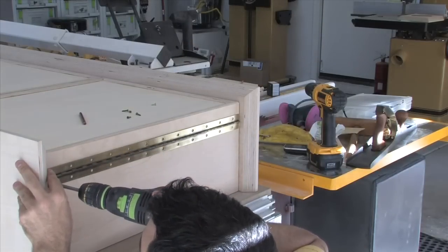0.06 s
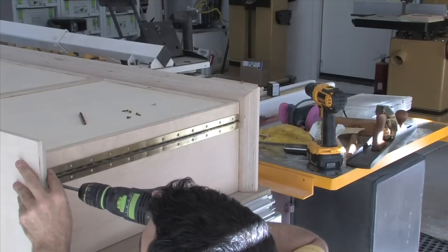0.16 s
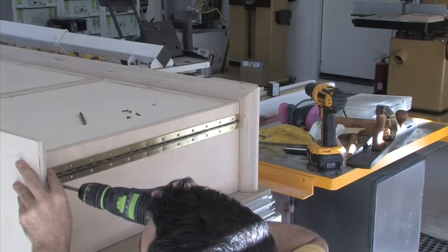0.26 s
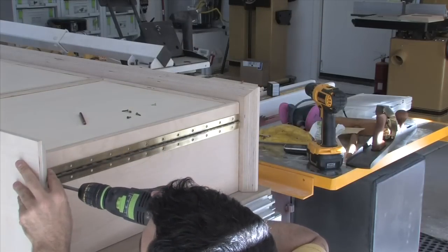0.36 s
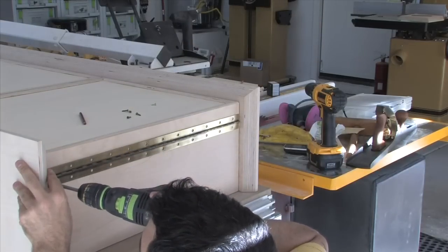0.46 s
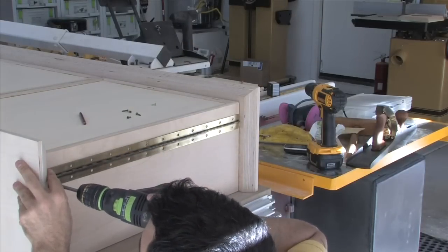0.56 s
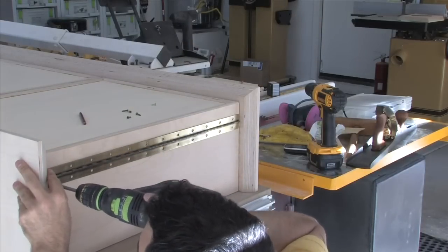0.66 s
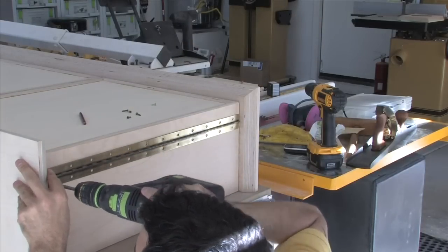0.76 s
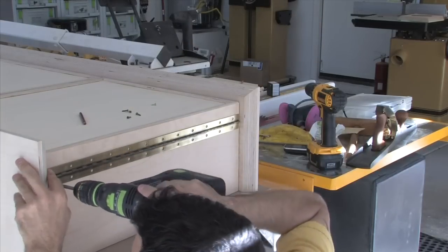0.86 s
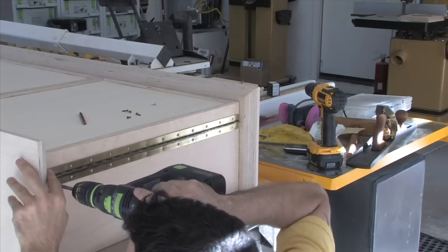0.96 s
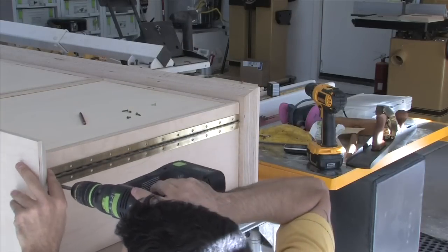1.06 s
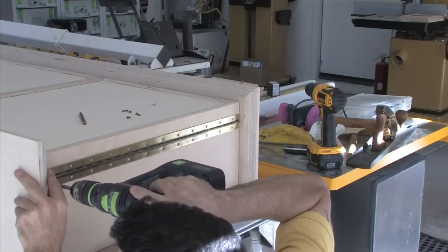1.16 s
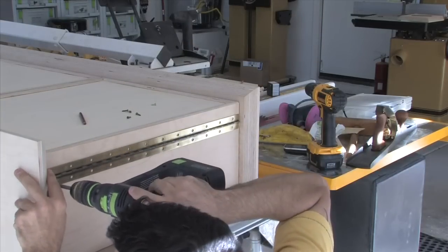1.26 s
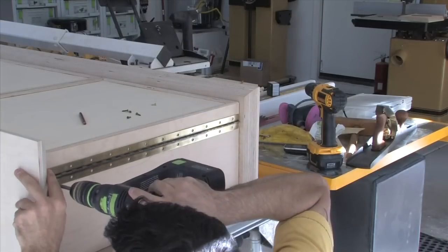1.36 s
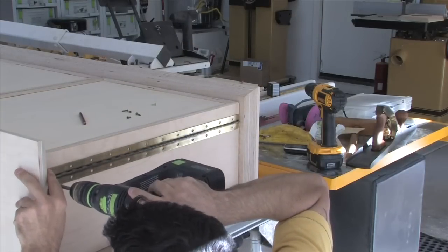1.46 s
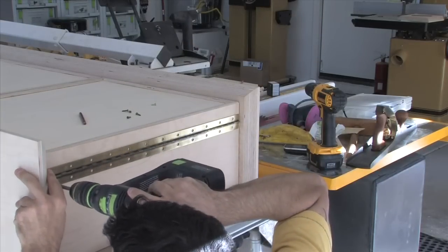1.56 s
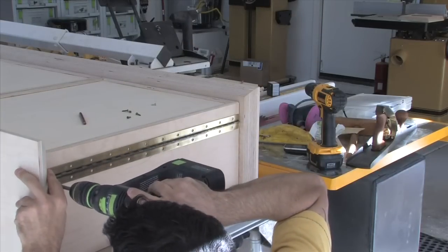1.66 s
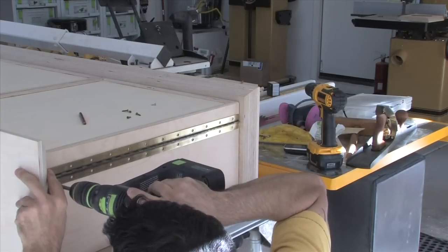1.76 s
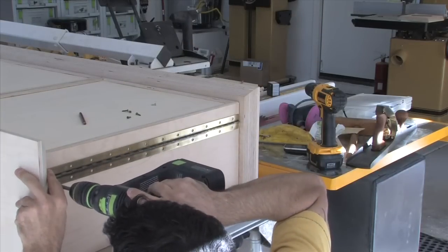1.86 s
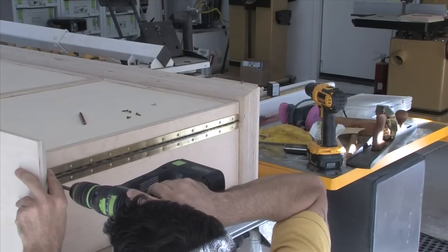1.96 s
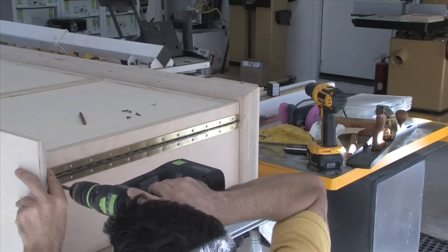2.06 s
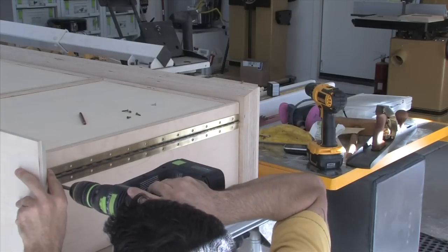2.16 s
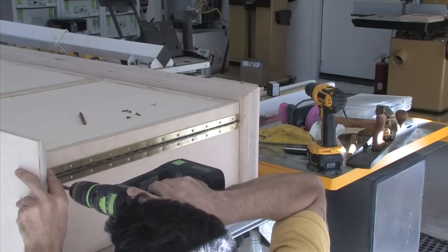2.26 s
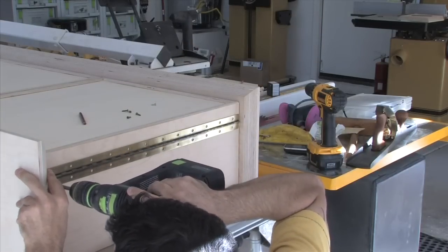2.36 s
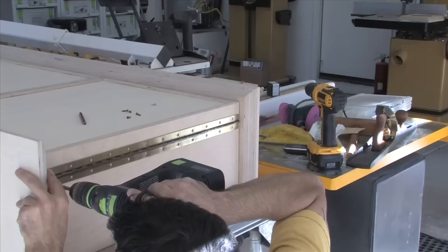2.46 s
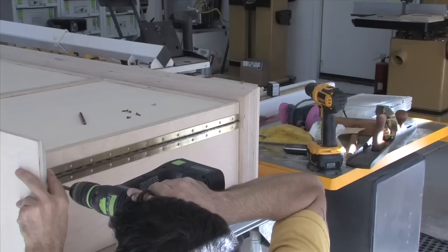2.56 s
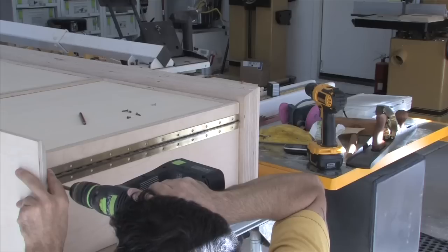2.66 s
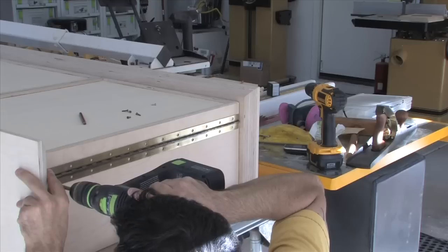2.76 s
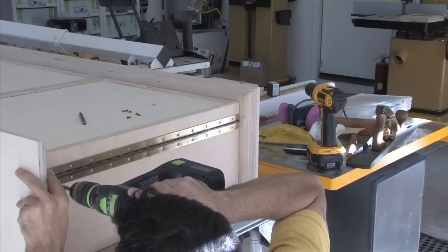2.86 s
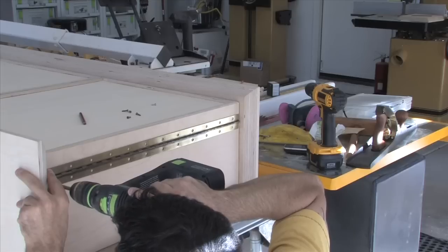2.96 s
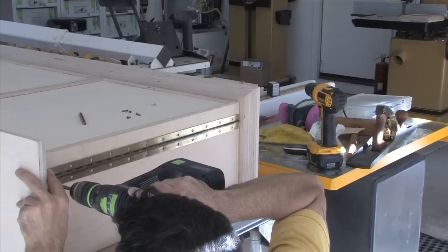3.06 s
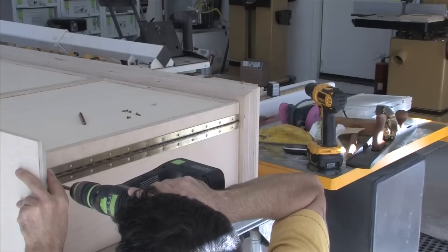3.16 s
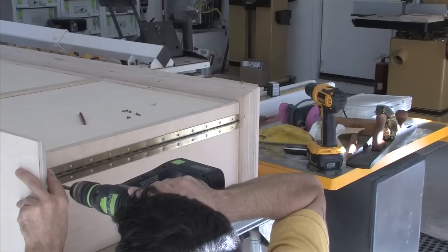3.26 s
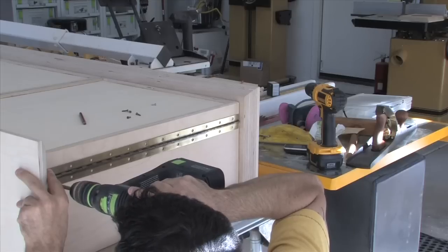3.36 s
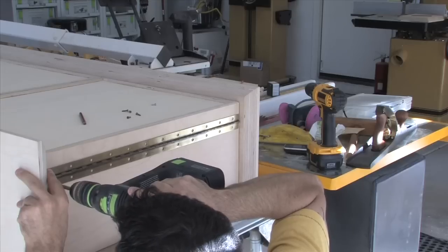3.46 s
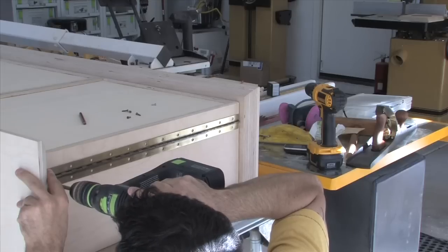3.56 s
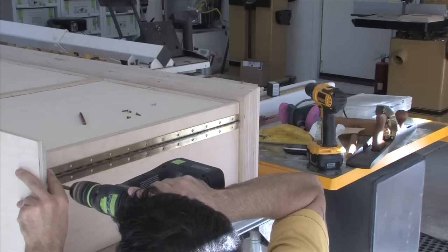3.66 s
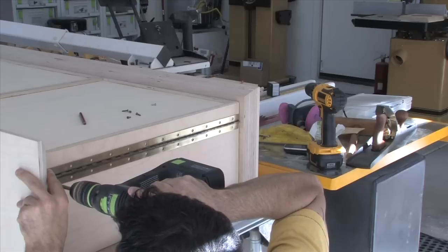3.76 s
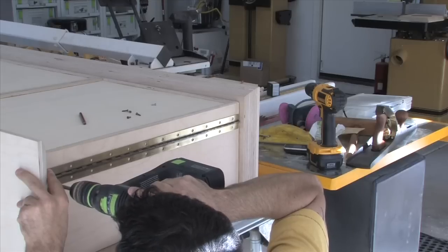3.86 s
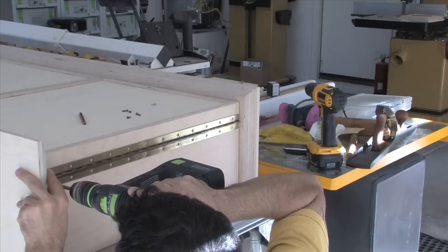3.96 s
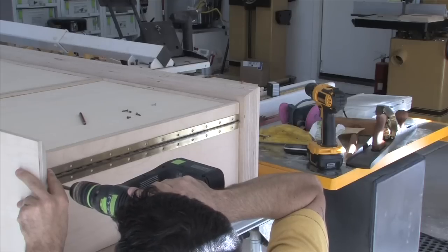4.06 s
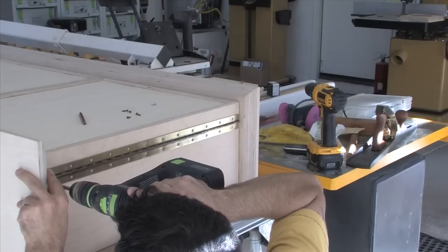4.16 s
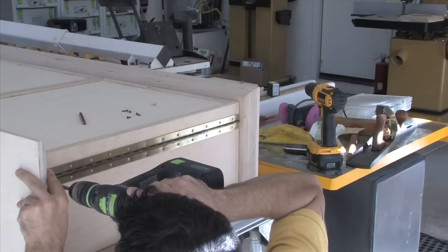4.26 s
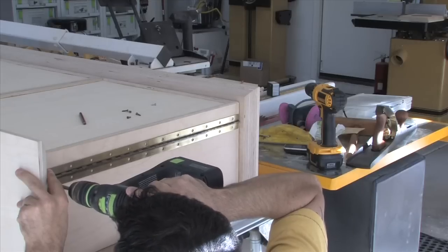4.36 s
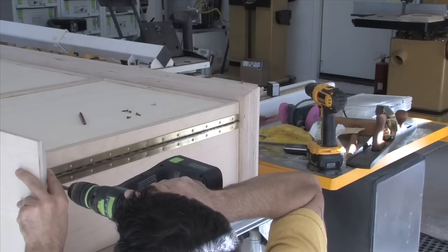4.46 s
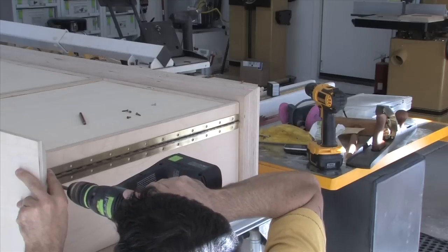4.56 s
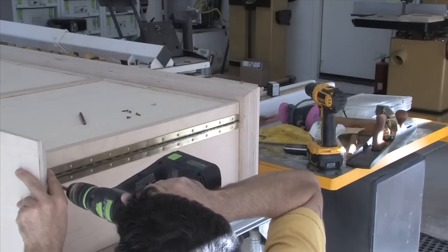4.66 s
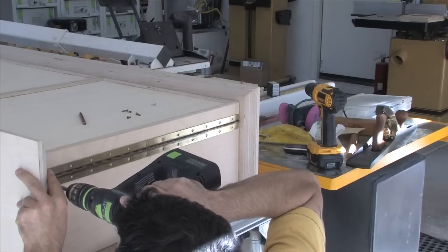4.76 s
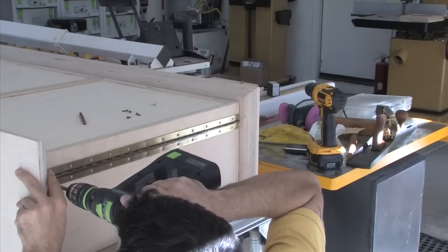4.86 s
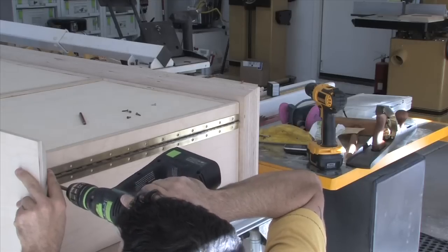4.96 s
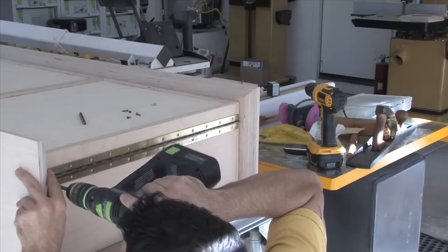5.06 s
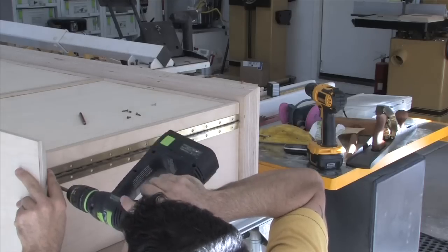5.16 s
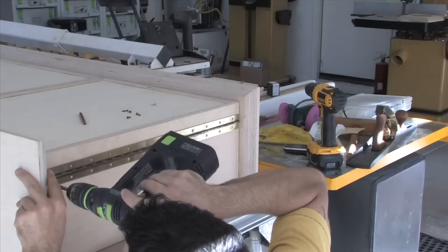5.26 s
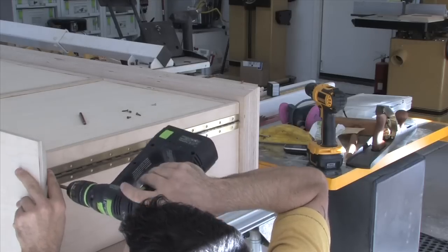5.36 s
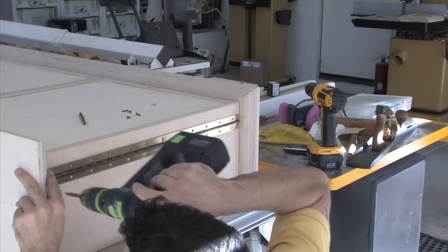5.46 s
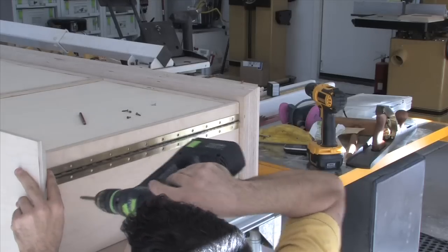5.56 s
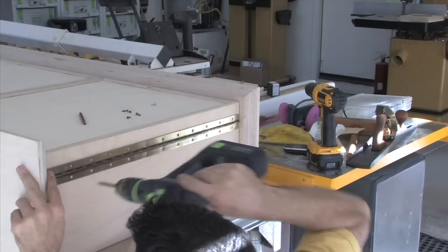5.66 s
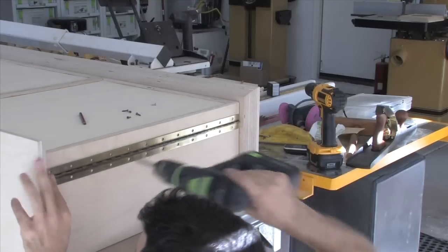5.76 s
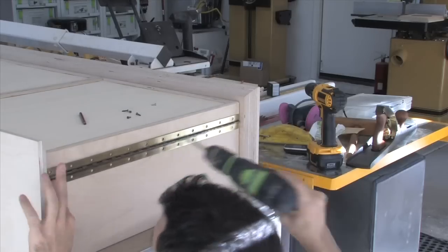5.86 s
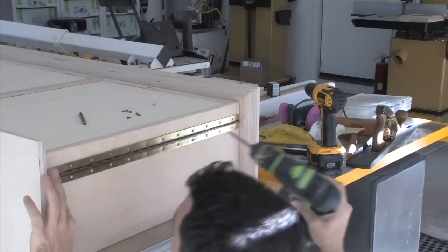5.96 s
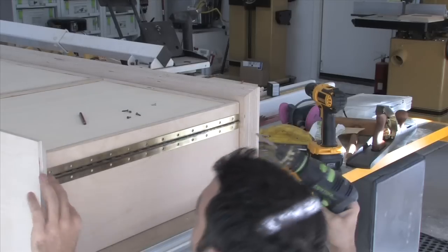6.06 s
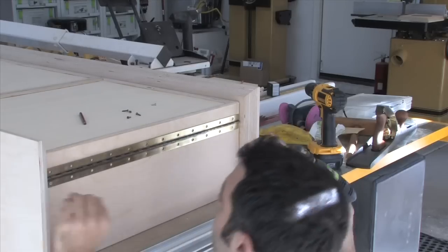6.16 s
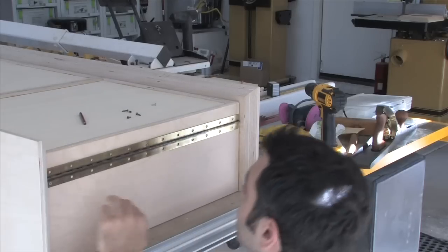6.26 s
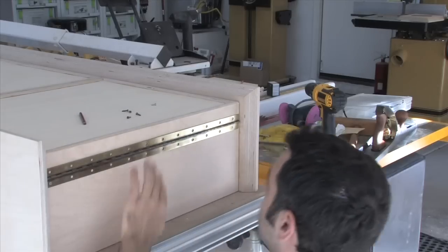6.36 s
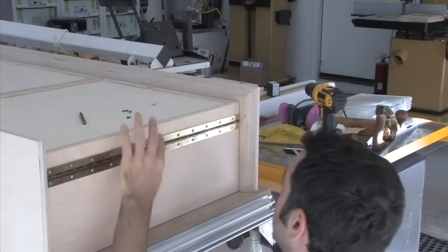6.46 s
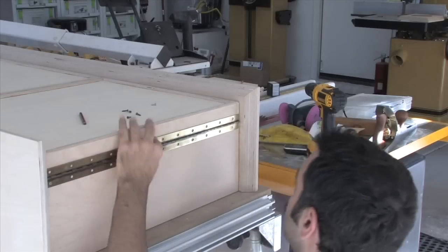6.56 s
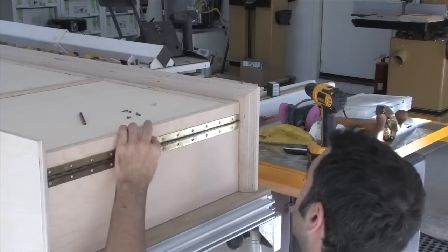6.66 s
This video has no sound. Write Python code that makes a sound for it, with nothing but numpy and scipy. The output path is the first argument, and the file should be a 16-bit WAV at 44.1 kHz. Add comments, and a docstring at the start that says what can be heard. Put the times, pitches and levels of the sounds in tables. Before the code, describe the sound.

A quiet workshop, heard close, with faint air, hiss and barely audible mains hum. A very faint bump comes at 0.7 s, then small steel ticks from 0.8 to 1.0 s. At 1.1 s a sharp click accompanies the drill starting: a low creeping whir that leaps upward at 1.3 s and again at 1.5 s, settling near full speed by 1.85 s. It holds a steady gear whine, dry rattle and thin high electronic whistle, with slight load from the screw. From 4.2 s it grows louder, raspier and growling, its pitch sagging until it cuts off at 4.8 s. A click at 4.95 s, then a very short motor burst at 5.1-5.23 s among crisp clicks and panel jolts. Soft rustling follows, with dull little bumps, a faint metallic clink at 6.1 s, and a distinct hollow knock on plywood at 6.6 s.

```python
"""Cordless drill on a plywood cabinet

Close by in a workshop, a brushless drill drives a small screw through a metal hinge into plywood.
The motor creeps, speeds up, sags as the screw tightens, and gives one more short nudge; its tones follow
the field rate. The bit clicks in the screw head as bursts of noise with a faint ring; then an arm shifts
as a soft rustle, and a hand knocks on the cabinet, ringing the plywood. Quiet air and mains hum lie below."""
import sys
import numpy as np
from scipy import signal
from scipy.fft import rfft, irfft, next_fast_len
from scipy.io import wavfile
from scipy.ndimage import uniform_filter1d, map_coordinates

SR = 44100
rng = np.random.default_rng(int(sys.argv[2]) if len(sys.argv) > 2 else 0)


def file_out(sig):
    """Save sig as 16-bit WAV at sys.argv[1]."""
    # one column per channel
    cols = np.atleast_2d(sig).T
    # limit, then scale
    lim = np.clip(cols, -1, 1)
    pcm = np.round(lim * 32767).astype(np.int16)
    wavfile.write(sys.argv[1], SR, pcm)


N = 296440

FULL_HZ = 1047  # field rate at full trigger, without load
TURNING_HZ = 107  # below this field rate the drill fades to silence
HARD_SPIN_UP_HZ_PER_S = 9600  # acceleration that strains the gears fully
MESH = 3.292  # whine of the first gear stage, as a multiple of the field rate
SWITCH_HZ = 7965  # switching rate of the inverter
TOP_HZ = 15850  # upper band limit of the microphone track

# Group levels in dB, before the trims of the single layers.
GEARS_DB, GEARS_SLOW_DB = -40, -17.5  # at full speed; change towards standstill
GEARS_LOAD_DB, GEARS_SPIN_UP_DB = 9.5, 1.5  # added by full load and by hard acceleration
SWITCH_DB, SWITCH_SLOW_DB = -45, -13.5  # at full speed; change towards standstill
COGGING_DB, COGGING_LOAD_DB = -49, -2  # hum at the field rate, full speed; added by full load
MOTOR_THIRD_DB = -46.8  # third harmonic, at full speed without load
WHINE_BITE_DB = 7  # added at half load, where the teeth mesh firmly without juddering
WHINE_JUDDER_DB = 2  # gain of the coarse bands near stalling and in a hard spin-up
RING_DB = -29  # ring of the bit in each click, while it is held in the screw
CLINK_S, CLINK_DB = 6.086, -47  # the free bit rings once as the drill is carried off
FLOOR_DB = -63.5  # rms of still air and hiss


def drill():
    """Everything in the tool turns with the motor's field and fades out as the field stops."""
    # How hard the screw resists. Each row: time in seconds, load 0-1; the last load holds.
    screw_load = [(2.1, 0), (3.4, 0.16), (4.14, 0.17), (4.4, 0.59), (4.65, 0.79), (4.8, 0.93)]
    load = np.clip(curves(screw_load)[0], 0, 1)
    field_hz, strain = motor()
    turns = np.cumsum(field_hz) / SR
    slow = 1 - field_hz / FULL_HZ
    running = np.clip(field_hz / TURNING_HZ, 0, 1)
    sound = gears(turns, field_hz, slow, load, strain)
    sound += cogging(turns, slow, load)
    sound += inverter(turns, slow, load)
    return running * sound


def motor():
    """Field rate in Hz and spin-up strain 0-1: ramps to each trigger setting, less what the screw takes."""
    # The finger squeezes in steps, lets go, then blips the trigger once.
    # Each row: start in seconds, change of the asked field rate in Hz, ramp in seconds.
    trigger = [(1.066, 278, .08), (1.275, 510, .056), (1.503, 152, .08), (1.655, 68, .043), (1.8, 39, .05),
               (4.79, -1047, .016), (5.103, 860, .052), (5.2, -860, .03)]
    # The screw drags the motor down. Each row: time in seconds, share of the speed lost; the last one holds.
    sag = [(1.85, 0), (3.2, .013), (3.33, .04), (3.41, .025), (4.14, .028), (4.4, .088), (4.52, .2),
           (4.68, .28), (4.79, .45)]
    asked_hz = sum(step_hz * np.clip((clock() - s) / ramp_s, 0, 1) for s, step_hz, ramp_s in trigger)
    field_hz = np.abs(asked_hz) * (1 - curves(sag)[0])
    acceleration = uniform_filter1d(np.gradient(field_hz) * SR, size=900)
    strain = np.clip(acceleration / HARD_SPIN_UP_HZ_PER_S, 0, 1)
    return field_hz * (1 + 0.001972 * wobble(12)), strain


def gears(turns, field_hz, slow, load, strain):
    """Teeth rattle in the housing, shafts hum, the first gear stage whines and the thread rasps."""
    # The whine swells through the gear case's resonance. Each row: mesh rate in Hz, level in dB.
    whine_levels = [(450, -82), (760, -50.5), (1900, -44.5), (2580, -44), (2740, -45.5), (3000, -38.5),
                    (3240, -41), (3410, -51.5)]
    gears_db = GEARS_DB + GEARS_SLOW_DB * slow + GEARS_LOAD_DB * load + GEARS_SPIN_UP_DB * strain
    whine_db = along(whine_levels, MESH * field_hz) + WHINE_BITE_DB * np.sin(np.pi * load)
    shafts = shaft_hum(turns, load) + load * torque_growl(turns)
    # the screw shakes the door panel
    panel = amp(-8 - 3 * load) * np.tanh(load / .17) * band(580 * clock(), width=70)
    noisy = rattle(turns, load) + filtered(shafts, radiated) + load * thread_rasp() + panel
    return amp(gears_db) * noisy + amp(whine_db) * mesh_whine(turns, field_hz, load, strain)


def rattle(turns, load):
    """Loose teeth strike at random, harder at certain angles of the planet gears, and ring the housing."""
    # Gearbox noise. Each row: frequency in Hz, relative level in dB per Hz.
    rattle_colour = [(53, -54), (90, -20), (473, -6.5), (586, -0.5), (743, -6), (1030, -3), (1250, -6.5),
                     (2890, 0), (4440, -16), (7290, -10), (7780, -13), (9240, -10), (9860, -19),
                     (11700, -22), (15500, -33)]
    beat = 1 + 0.18 * np.sin(2 * np.pi * (MESH - 3) * turns)
    beat += 0.1 * np.sin(2 * np.pi * .0335 * turns)
    strikes = rng.standard_normal(N) * (rng.random(N) < .3) * beat
    return amp(-0.07 - 2 * load) * unit(filtered(coloured(strikes, rattle_colour), body))


def shaft_hum(turns, load):
    """Shafts and gears each give a tone locked to the field rate, with its own roughness."""
    # Each row: multiple of the field rate, relative level in dB, roughness 0-1.
    shaft_tones = [(.297, -20.5, 0.38), (.411, -21.5, .25), (.574, -20.5, 0.42), (.656, -38, 0.6),
                   (.875, -18, 0.2), (1.125, -25, 0.4), (1.365, -21, 0.36), (1.66, -24, 0.27),
                   (1.816, -21, 0.4), (2.27, -26, .4), (2.72, -16.5, .6), (3.629, -24.5, 0.77),
                   (4.127, -29.5, 0.7)]
    hum = sum(amp(db) * tone(order * turns, rough, flutter=25) for order, db, rough in shaft_tones)
    return hum * amp(0.5 - 1.2 * load)


def torque_growl(turns):
    """The slow stages growl in bands of noise that follow the field rate."""
    growl = amp(-5) * band(1.64 * turns, width=330)
    growl += amp(-13.5) * band(1.1 * turns, width=460)
    return growl + amp(-21.5) * band(5.5 * turns, width=800)


def thread_rasp():
    """The thread rasps in the wood: noise whose level shakes fast and unevenly."""
    grain = rng.standard_normal(N) * amp(6.1 * wobble(350))
    colour = [(900, -17), (2200, 20), (3000, -13), (4500, 12.0), (6500, 2.5), (9000, -6), (12000, -35)]
    return amp(-13.0) * coloured(grain, colour)


def mesh_whine(turns, field_hz, load, strain):
    """Load presses the teeth together and purifies the whine; near stalling or in a hard spin-up it judders."""
    judder = np.clip(1.1 * load ** 7 + .5 * strain, 0, 1)
    pure = tone(MESH * turns, .45 * (1 - load) ** 2, flutter=70)
    coarse = band(MESH * turns, width=370) + amp(-3) * band(4.6 * turns, width=450)
    mesh = np.sqrt(1 - judder) * pure + amp(WHINE_JUDDER_DB) * judder * coarse
    # the teeth barely sing while the motor creeps
    creep = np.clip(1.8 - field_hz / 300, 0, 1) * (1 - load)
    whine = amp(-10 * creep) * mesh
    # higher gear tones stand out while creeping, under load and in a hard spin-up
    whine += (amp(-11) * creep + amp(-19) * load) * tone(2 * MESH * turns, 0.72, flutter=93)
    whine += amp(-10) * creep * tone(9 * turns, 0.65, flutter=50)
    whine += amp(-3) * strain ** 2 * tone(4.7 * turns, .7, flutter=80)
    return whine


def cogging(turns, slow, load):
    """The rotor hums at the field rate and its third harmonic, which leads while creeping; little bass gets out."""
    first_db = COGGING_DB + COGGING_LOAD_DB * load - 42 * slow * (1 - load)
    third_db = MOTOR_THIRD_DB - 8 * slow - 15 * load
    first = amp(first_db) * tone(turns, 0.11, flutter=25)
    third = amp(third_db) * tone(3 * turns, .15, flutter=25)
    return filtered(first + third, lambda hz: hz ** 6 / (hz ** 6 + 560 ** 6))


def inverter(turns, slow, load):
    """The windings sing at the switching rate, with side tones at multiples of the field rate away."""
    carrier = SWITCH_HZ * clock()
    above_db = -2 + 4 * np.tanh(load / 0.088) - 17 * load ** 2 + 2.5 * slow
    below_db = -13 + 7.2 * load ** 3 + 8 * slow
    sound = amp(-9 * slow ** 2 * (1 - load)) * tone(carrier, 0.047, flutter=15)
    sound += amp(above_db) * tone(carrier + turns, 0.098, flutter=15)
    sound += amp(below_db) * tone(carrier - turns, 0.37, flutter=34)
    sound += amp(-28) * tone(carrier + 4 * turns, .4, flutter=60)
    sound += amp(-10) * slow ** 2 * (1 - load) * tone(carrier + 7 * turns, .4, flutter=60)
    sound += amp(-33) * tone(2 * carrier - turns, .3, flutter=30)
    return amp(SWITCH_DB + SWITCH_SLOW_DB * slow) * sound


def body(hz):
    """Direct sound plus the resonances of the housing and the panel it presses on."""
    # Each row: frequency in Hz, width in Hz, level in dB.
    resonances = [(417, 30, -3), (586.5, 49, 3.5), (810, 76, -18), (1433, 470, -4), (2240, 450, -23.5),
                  (3430, 1020, -6), (5040, 160, -0.5)]
    return 1 + sum(amp(db) * 1j * hz * w / (c * c - hz * hz + 1j * hz * w) for c, w, db in resonances)


def radiated(hz):
    """The small housing gives out little bass and stresses its resonances."""
    return body(hz) * hz ** 3 / (hz ** 3 + 330 ** 3)


def clicks():
    """Steel on steel: a crack of a few milliseconds with a faint ring of the bit."""
    # Bit, chuck and trigger. Each row: start in seconds, level in dB, treble trim in dB, body trim in dB.
    click_times = [(0.812, -45.5, -25, 1), (0.948, -33.5, -10.5, 1.5), (1.006, -43, -35, -5),
                   (1.11, -23.5, -16.5, -14.5), (4.949, -32.5, -18, -19), (5.064, -33, -7.5, 3),
                   (5.081, -38, -17, -1), (5.111, -34, -17, -11), (5.216, -28, -11, -7),
                   (5.229, -28, -20, -4), (5.451, -44, -29, -18), (6.085, -40, -9, 2)]
    # Colour of a crack. Each row: frequency in Hz, relative level in dB per Hz.
    crack_colour = [(180, -51), (300, -26), (863, 0.5), (1730, -7), (2100, 1.5), (3570, -9.5), (4000, -15),
                    (8420, -11.5), (11000, -27), (13800, -27), (15500, -32)]
    # Modes of bit and chuck. Each row: frequency in Hz, level in dB, 60 dB decay in seconds.
    steel = [(3030, -6, 0.11), (3460, 1, 0.048), (3480, -3, 0.059)]
    out, t = np.zeros(N), clock(SR // 8)
    for s, db, treble_db, body_db in click_times:
        tilt = [(900, body_db + 13.0), (2500, 0), (6000, treble_db + 16.5)]
        crack = coloured(coloured(rng.standard_normal(len(t)), crack_colour), tilt)
        # a short hump, then a weaker tail
        contact = np.exp(-((t - .0026) / 0.0014) ** 2) + amp(-7.0 - 60 * t / 0.043)
        sound = amp(-7.0) * crack * contact + amp(RING_DB) * ringing(steel, t)
        add(out, s, amp(db) * sound * np.minimum(t / 0.0011, 1))
    add(out, CLINK_S, amp(CLINK_DB) * ringing(steel, t))
    return out


def knocks():
    """Soft blows give a dry slap and a short ring of the plywood; the loose door panel sounds longer."""
    # Dull knocks on the cabinet, and jolts as the drill starts and stops.
    # Each row: start in seconds, level in dB, bass trim in dB, door panel level in dB.
    blows = [(0.675, -65.5, -14, 4), (5.115, -47.5, -28, 13), (5.219, -44.5, -28, 11.5), (5.457, -48, 4, 3),
             (5.664, -53.5, 1, 4), (5.826, -52.5, -30, -9), (6.086, -46, -24, -2), (6.207, -42.5, -22, -23),
             (6.3, -48.5, -10, -13), (6.437, -50, -20, -3), (6.597, -25.5, -8, -31), (6.709, -47, -18, -20)]
    # Modes of the cabinet. Each row: frequency in Hz, level in dB, 60 dB decay in seconds before damping.
    plywood = [(279, -9.5, 0.083), (419, 0, 0.061), (499, -3.5, 0.092), (783, 1.5, 0.053),
               (1167, -5, 0.038), (1344, -4.5, 0.025), (1620, -9, .035), (2020, -7, 0.028)]
    slap_colour = [(150, -18), (400, 5.5), (1500, 2.0), (3500, -21.5), (8000, -16.0), (15000, -32)]
    out, t = np.zeros(N), clock(SR // 4)
    for s, db, bass_db, panel_db in blows:
        tilt = [(400, bass_db + 7.5), (700, 0)]
        modes = [(hz, level + along(tilt, hz), t60) for hz, level, t60 in plywood]
        wood = ringing(modes, t) * np.exp(-t / 0.026)  # the hand stays on the wood and damps it
        panel = amp(panel_db) * ringing([(591, 0, 0.077)], t)
        slap = coloured(rng.standard_normal(len(t)), slap_colour) * amp(-60 * t / 0.078)
        blow = 1.82 * wood + 1.6 * panel + 0.54 * slap
        add(out, s, amp(db) * blow * (1 - np.exp(-t / 0.0016)))  # soft onset
    return out


def handling():
    """The arm and the tool slide away from the cabinet with a fine, uneven rustle."""
    # Each move swells and fades. Each row: middle in seconds, length in seconds, level in dB.
    moves = [(5.336, 0.23, -59.5), (5.862, 0.87, -63), (6.39, 1.0, -56.5)]
    # Colour of the rub. Each row: frequency in Hz, relative level in dB per Hz.
    sleeve = [(71, -17), (120, -8.5), (417, -7.5), (621, -1.5), (1380, -12), (2160, -10.5), (2880, -22.5),
              (3580, -16.5), (4530, -28), (9000, -32), (11700, -64), (19800, -120)]
    rub = coloured(rng.standard_normal(N) * amp(2.6 * wobble(40) + 1.9 * wobble(200)), sleeve)
    swells = np.zeros(N)
    for s, length, db in moves:
        swells += amp(db) * np.cos(np.pi * np.clip((clock() - s) / length, -.5, .5)) ** 2
    return rub * swells


def workshop(x):
    """The room's answer: a tail of decaying noise in which the treble dies first."""
    # Each row: frequency in Hz, 60 dB decay in seconds.
    decay = [(150, 0.99), (600, 0.55), (3000, 0.49), (10000, 0.16)]
    hz, t, z = signal.stft(rng.standard_normal(SR), SR, nperseg=256)
    fading = z * amp(-60 * t / along(decay, hz)[:, None])
    tail = signal.istft(fading, SR, nperseg=256)[1]
    tail = filtered(tail, lambda f: amp(along([(600, -3), (3000, -8.0), (8000, -14.5)], f)))
    return signal.fftconvolve(x, tail / np.linalg.norm(tail))[:N]


def background():
    """Quiet workshop air and hiss, as coloured noise, with a little mains hum."""
    # Still air and hiss. Each row: frequency in Hz, relative level in dB per Hz.
    air = [(12, -44), (20, 0), (68, -10.5), (123, -7), (153, -12.5), (203, -14.5), (247, -8), (284, -14),
           (3800, -21.5), (5620, -20.5), (9040, -21), (10100, -20.5), (15800, -21.5)]
    # Mains hum. Each row: frequency in Hz, level in dB.
    mains = [(120, -83), (240, -76)]
    hum = sum(amp(db) * tone(hz * clock(), .02, flutter=3.7) for hz, db in mains)
    return amp(FLOOR_DB) * coloured(rng.standard_normal(N), air) + hum


def amp(db):
    """Decibels to gain."""
    return 10 ** (np.asarray(db) / 20)


def unit(x):
    """Scale to rms 1."""
    return x / np.sqrt(np.mean(x ** 2) + 1e-20)


def along(points, hz):
    """Read (Hz, value) points on a log frequency axis."""
    f, v = np.transpose(points)
    return np.interp(np.log(hz + 1), np.log(f + 1), v)


def clock(count=N):
    """Time of each sample in seconds."""
    return np.arange(count) / SR


def curves(rows):
    """One value per sample for each column after the time."""
    s, *cols = np.transpose(rows)
    return [np.interp(clock(), s, c) for c in cols]


def wobble(rate):
    """A smooth random curve, rate knots a second."""
    knots = rng.standard_normal(int(N * rate / SR) + 4)
    return map_coordinates(knots, [clock() * rate], order=2)


def filtered(x, response):
    """x times a response of frequency."""
    m = next_fast_len(len(x) + 8192)  # padding keeps the end from wrapping onto the start
    return irfft(rfft(x, m) * response(np.fft.rfftfreq(m, 1 / SR)), m)[:len(x)]


def coloured(x, spectrum):
    """x shaped by the given spectrum, at rms 1."""
    return unit(filtered(x, lambda hz: amp(along(spectrum, hz))))


def tone(turns, rough, flutter):
    """A sine of about rms 1; roughness shakes its size and phase, at flutter knots a second."""
    size = amp(3.7 * rough * wobble(flutter))
    return np.sqrt(2) * size * np.sin(2 * np.pi * turns + 1.5 * rough * wobble(flutter))


def band(turns, width):
    """Narrow noise of rms 1 that follows a pitch."""
    return unit(wobble(width) * np.sin(2 * np.pi * turns) + wobble(width) * np.cos(2 * np.pi * turns))


def ringing(modes, t):
    """Damped modes, struck at slightly new strengths each time, scaled to peak 1."""
    ring = np.zeros(len(t))
    for hz, db, t60 in modes:
        decay = amp(db + rng.normal(0, 1) - 60 * t / t60)
        ring += decay * np.sin(2 * np.pi * (hz * t + rng.random()))
    return ring / np.abs(ring).max()


def add(track, s, sound):
    """Lay a sound into a track at s seconds."""
    part = track[round(s * SR):][:len(sound)]
    part += sound[:len(part)]


def scene():
    """The drill and the hands, close by, with the room's answer and the background."""
    near = drill() + clicks() + knocks() + handling()
    return (near + amp(-16.5) * workshop(near) + background())[None]


def record(dry):
    """The microphone track keeps nothing above its band limit."""
    return filtered(dry[0], lambda hz: hz < TOP_HZ)[None]


dry = scene()
out = record(dry)
file_out(out)
```